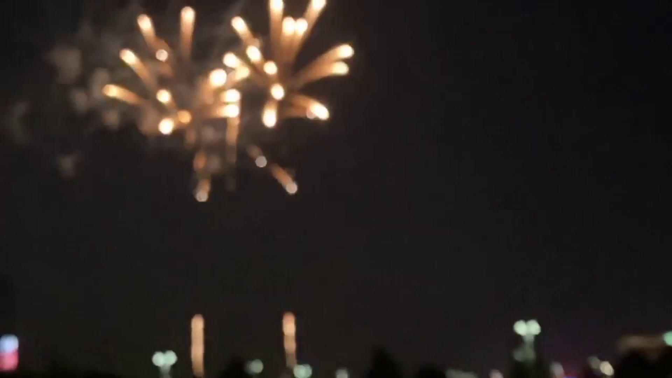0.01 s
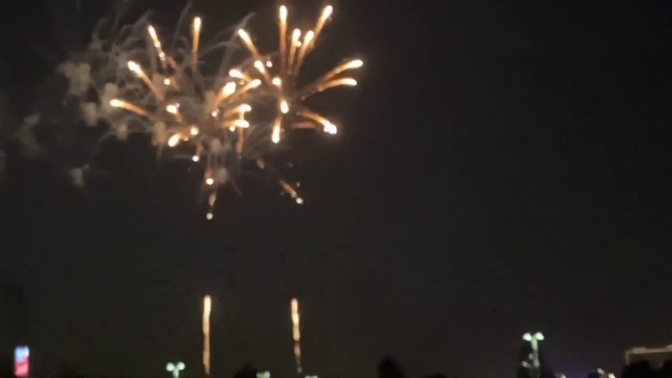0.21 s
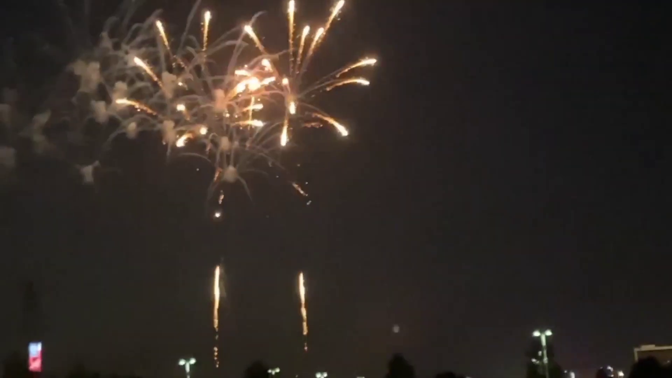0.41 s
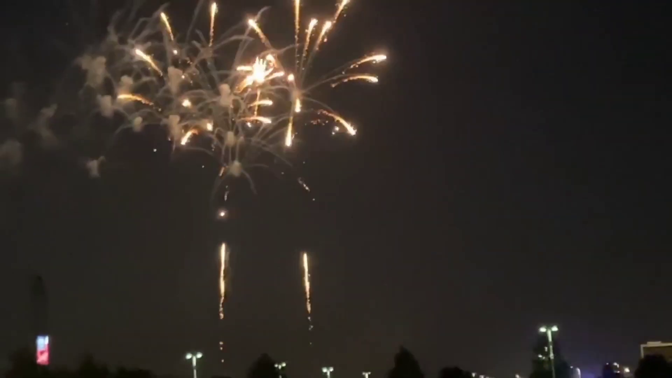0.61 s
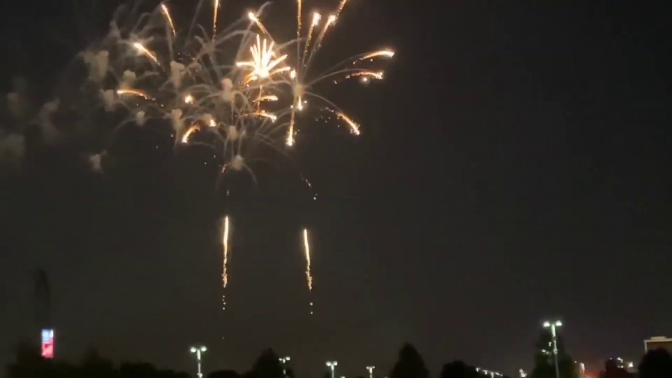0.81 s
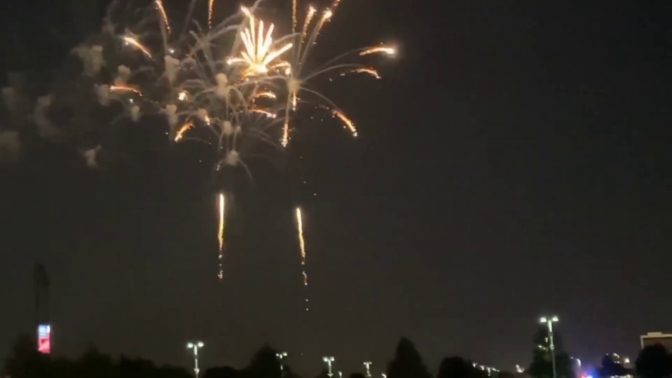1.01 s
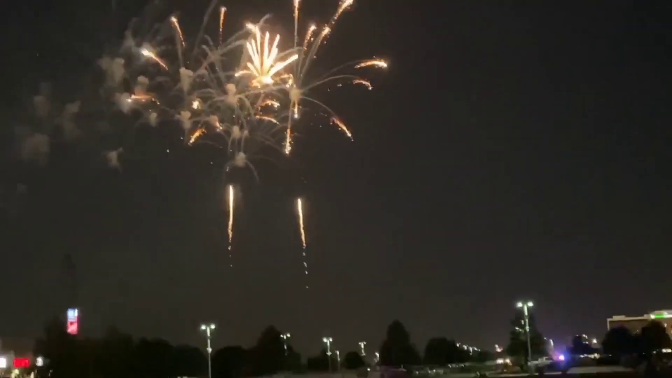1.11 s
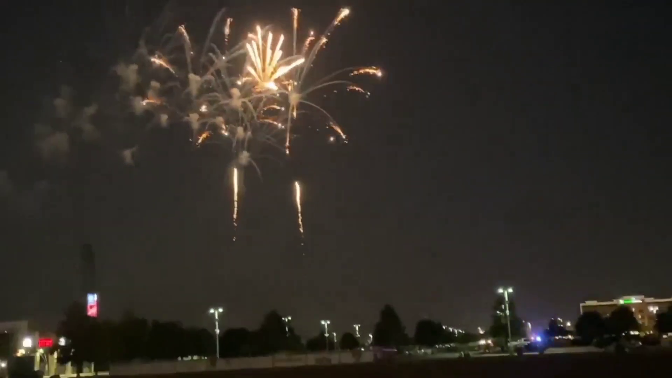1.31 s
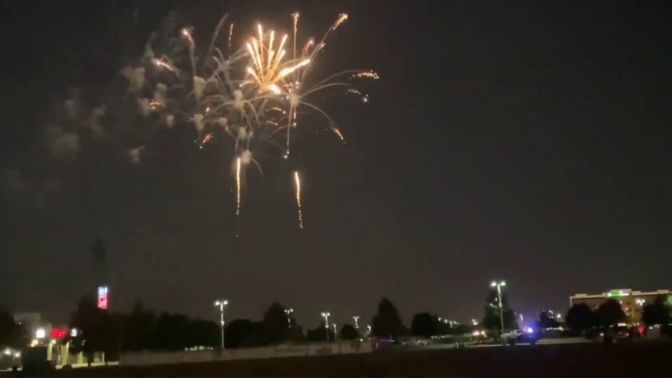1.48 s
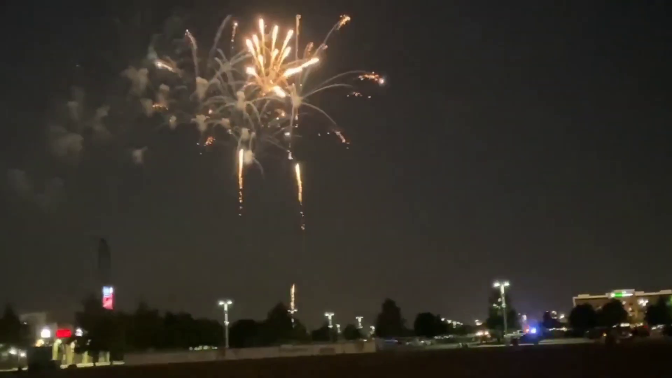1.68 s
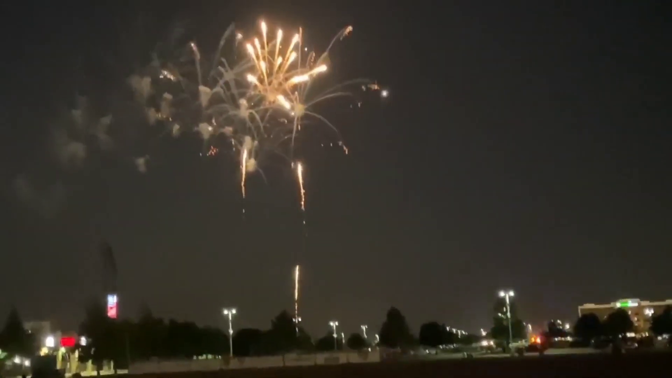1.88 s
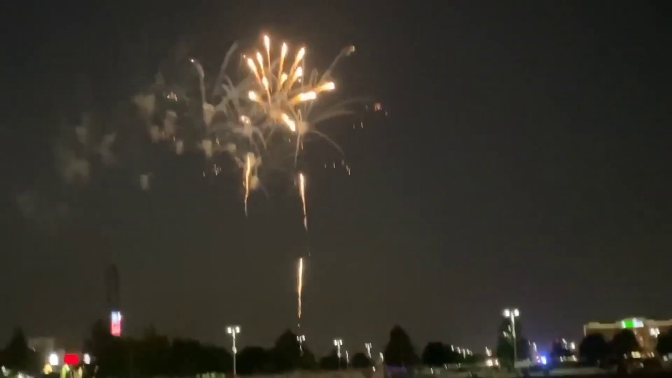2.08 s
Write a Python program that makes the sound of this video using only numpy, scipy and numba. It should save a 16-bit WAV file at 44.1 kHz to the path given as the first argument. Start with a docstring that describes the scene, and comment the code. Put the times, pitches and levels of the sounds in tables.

```python
"""A faint sizzle over a low rumble, then two sharp bangs and duller thuds: fireworks far across an open field at night.
A phone hears each blast as a fast downward sweep, treble first and bass last, that rolls back off the surroundings.
Single stars snap, random sparks make the sizzle, and filtered noise makes the rumble, the roll and a distant wash.
The phone's limiter holds down all but the bass for a moment after loud bangs, so the sizzle ducks."""
import sys
import numpy as np
from scipy import signal
from scipy.fft import rfft, irfft
from scipy.io import wavfile
from scipy.ndimage import uniform_filter1d, minimum_filter1d
from numba import njit

SR = 44100
rng = np.random.default_rng(int(sys.argv[2]) if len(sys.argv) > 2 else 0)


def digitize_waveform(pressure):
    """Quantize a signal to 16-bit integers and store it at the path in sys.argv[1].

    Rows of a 2-D input are taken as channels; values are limited to [-1, 1].
    """
    field = np.atleast_2d(pressure).T
    bounded = np.clip(field, -1, 1)
    quanta = np.round(bounded * 32767).astype(np.int16)
    wavfile.write(sys.argv[1], SR, quanta)


N = 92610  # 2.1 s


def undb(db):
    """Decibels to gain."""
    return 10 ** (np.asarray(db) / 20)


def unit(x):
    """Scale to rms 1."""
    return x / np.sqrt(np.mean(x ** 2))


def bins():
    """Frequency of every spectral bin in Hz, at least 1."""
    return np.maximum(np.arange(N // 2 + 1) * SR / N, 1)


def colour(points):
    """Gain in every bin, drawn through (Hz, dB) points on a log frequency axis."""
    hz, db = np.array(points).T
    return undb(np.interp(np.log(bins()), np.log(hz), db))


def causal(gain):
    """Minimum-phase spectrum: the given gains, ringing only after the onset."""
    cepstrum = irfft(np.log(gain), N)
    cepstrum[1:N // 2] *= 2
    cepstrum[N // 2 + 1:] = 0
    return np.exp(rfft(cepstrum))


def tail(delay_s, decay_s):
    """Spectrum of an exponentially dying cloud of noise with unit energy."""
    t = np.arange(N) / SR - delay_s
    cloud = rng.standard_normal(N) * (t > 0) * np.exp(-np.abs(t) / decay_s)
    return rfft(cloud / np.linalg.norm(cloud))


def walk(rate):
    """Smooth random wander of rms 1 that takes a new value about rate times a second."""
    step = int(SR / rate)
    stairs = np.repeat(rng.standard_normal(N // step + 1), step)
    smooth = uniform_filter1d(uniform_filter1d(stairs, step), step)
    return unit(smooth[:N])


# Stereo width of the steady sounds and the echoes at the phone. Each row: frequency in Hz, side against mid in dB.
WIDTH = [(60, -24), (110, -25), (200, -12.5), (360, -10.5), (650, -7), (1200, -2.5), (1950, -6),
         (2300, -74), (7000, -47)]


def spread(mid, side, points):
    """Two noises become mid and side of a coloured stereo pair, widest in the middle frequencies."""
    mid_spectrum = rfft(mid) * colour(points)
    side_spectrum = rfft(side) * colour(points) * colour(WIDTH)
    return unit(irfft(np.array([mid_spectrum + side_spectrum, mid_spectrum - side_spectrum]), N))


# The blasts over the field. Each row: start in seconds, relative level in dB, corner in Hz above which
# it is dull, sweep in cycles of delay, ground bounce delay in seconds, relative crack level in dB.
BURSTS = [(0.2118, 2, 12400, 1.05, .0014, -3.5), (0.3982, 2, 11000, .92, 0.0019, 0),
          (0.882, -11, 170, 1, 0.0056, -42.5), (1.103, 5, 84, 1.4, .0055, -10),
          (1.193, 0.5, 188.4, .9, 0.0059, -3.5), (1.285, -12.5, 290, .6, .0028, -14.5),
          (1.912, -6, 84, 1, 0.01, -25), (2.042, -19.5, 192, 1.95, .0035, -29)]
# Spectrum of a blast before dulling. Each row: frequency in Hz, relative level in dB.
BLAST = [(20, -32), (48, -15.5), (62, -6.5), (87, 2), (140, 0.5), (180, -3.5), (245, -8), (310, -10.5),
         (410, -2.5), (650, -8), (830, -12), (1050, -17.5), (2000, -22.5), (2900, -30), (4000, -33.5),
         (5600, -38.5), (8000, -46.5), (11000, -51.5), (14000, -70)]
# Blast at the two microphones. Each row: frequency in Hz, left minus right in dB.
BLAST_PAN = [(200, -0.5), (400, -2.5), (700, 2), (1150, 5.5), (2100, 0), (3500, 0)]
# Crackle that opens a burst. Each row: frequency in Hz, relative level in dB.
CRACK = [(250, -38), (500, -24), (1000, -27), (2400, -42), (4500, -39.5), (6500, -57), (8500, -75),
         (12000, -100)]
# Colour of the echoes off the surroundings. Each row: frequency in Hz, relative level in dB.
ECHO = [(40, -23), (90, -6), (180, 4), (260, -3.5), (330, -15.5), (1000, -12), (4000, -5)]
BLAST_DB = 41.5  # added to every burst level
RIGHT_LAG_S, LAG_BELOW_HZ = .00017, 1320
SWEEP_ZERO_HZ = 6400  # here the sweep leaves the phase alone
GROUND_DB = -11  # strength of the ground bounce
CRACK_DECAY_S = 0.013
SCATTER_DB, SCATTER_ABOVE_HZ, SCATTER_S = 3, 2150, .003  # ragged edge just behind the front
ECHO_DB, ECHO_DELAY_S, ECHO_DECAY_S = -13, 0.028, 0.058


def bursts():
    """Swept pressure pulses, each with an inverted ground bounce, a rough crack, a ragged edge and low echoes."""
    f, sides = bins(), np.array([[1], [-1]])  # left, right
    lag = RIGHT_LAG_S / (1 + (f / LAG_BELOW_HZ) ** 6)
    ports = colour(BLAST_PAN) ** (sides / 2) * np.exp(1j * np.pi * f * lag * sides)
    blast, crackle, echoes, width = colour(BLAST), colour(CRACK), colour(ECHO), colour(WIDTH)
    out = 0
    for start, db, dull_hz, cycles, bounce_s, crack_db in BURSTS:
        # every frequency is late by the same number of its own cycles
        sweep = np.exp(-2j * np.pi * cycles * np.log(f / SWEEP_ZERO_HZ))
        ground = 1 - undb(GROUND_DB) * np.exp(-2j * np.pi * f * bounce_s)
        body = causal(blast / np.hypot(1, (f / dull_hz) ** 4)) * sweep * ground
        ragged = undb(SCATTER_DB) * tail(0, SCATTER_S) * f / (f + SCATTER_ABOVE_HZ)
        crack = undb(crack_db) * crackle * tail(0, CRACK_DECAY_S)
        echo_mid = tail(ECHO_DELAY_S, ECHO_DECAY_S)
        echo_side = width * tail(ECHO_DELAY_S, ECHO_DECAY_S)
        echo = undb(ECHO_DB) * echoes * (echo_mid + sides * echo_side)
        arrival = undb(BLAST_DB + db) * np.exp(-2j * np.pi * f * start)
        direct = ports * (body * (1 + ragged) + crack)
        out = out + arrival * (direct + body * echo)
    return irfft(out, N)


# Snaps of single stars. Each row: start in seconds, energy in dB, centre in Hz.
SNAPS = [(1.1135, -6.5, 3700), (1.193, -6, 2420), (1.198, -17, 4360), (1.2727, -13.5, 2700)]
SNAP_DECAY_S, SNAP_WIDTH_OCT, SNAP_SKIRT_DB = .003, 0.49, -55


def snaps():
    """Single stars that pop: a few milliseconds of noise around one pitch."""
    out = 0
    for start, db, hz in SNAPS:
        band = np.exp(-(np.log2(bins() / hz) / SNAP_WIDTH_OCT) ** 2)
        pop = irfft(causal(band + undb(SNAP_SKIRT_DB)) * tail(start, SNAP_DECAY_S), N)
        out = out + undb(db) * pop / np.linalg.norm(pop)
    return out


SPARKS_PER_S, SPARK_SPREAD_DB = 1500, 3.5
SPARK_SHARE = 0.57  # share of the power in pops, the rest is hiss


def sparks():
    """Dense one-sample pops of uneven size and random sign, mixed with hiss."""
    sizes = undb(SPARK_SPREAD_DB * np.minimum(rng.standard_normal(N), 2))
    pops = (rng.random(N) < SPARKS_PER_S / SR) * rng.choice([-1, 1], N) * sizes
    hiss = rng.standard_normal(N)
    return np.sqrt(SPARK_SHARE) * unit(pops) + np.sqrt(1 - SPARK_SHARE) * hiss


FLUTTER_DB, FLUTTER_PER_S = 1.3, 70
DRIFT_DB, DRIFT_PER_S = 0.67, 9.03


def shimmer(x):
    """Each half-octave flutters and drifts in level on its own."""
    octave, spectrum = np.log2(bins()), rfft(x)
    out = 0
    for k in range(12, 29):  # centres from 64 Hz to 16 kHz
        band = irfft(spectrum * np.maximum(1 - np.abs(2 * octave - k), 0), N)
        out = out + band * undb(FLUTTER_DB * walk(FLUTTER_PER_S) + DRIFT_DB * walk(DRIFT_PER_S))
    return unit(out)


# Sizzle of the burning stars. Each row: frequency in Hz, relative density in dB per Hz.
SIZZLE = [(300, -1.5), (700, -7), (1150, -4), (1450, 1.5), (2500, 0), (2900, -5), (3250, -1), (3750, -5.5),
          (4300, -6), (5600, -11), (6600, -18.5), (7800, -30), (8800, -65.5), (14000, -92)]
FLICKER_DB, FLICKER_PER_S = 0.7, 34.9


def sizzle():
    """Burning stars: coloured sparks that shimmer by band and flicker as a whole."""
    return undb(FLICKER_DB * walk(FLICKER_PER_S)) * shimmer(spread(sparks(), sparks(), SIZZLE))


def even(x):
    """Smooth the lumps out of a low noise, over 70 ms, so that it rolls on without gaps."""
    power = uniform_filter1d(np.mean(x ** 2, axis=0), int(.07 * SR))
    return unit(x / np.sqrt(power + 1e-6))


# Echoes of earlier bursts rolling round the field. Each row: frequency in Hz, relative density in dB per Hz.
ROLL = [(70, -25), (110, 0.5), (135, 1.5), (190, -2.5), (255, -8), (300, -17), (600, -84)]


def roll():
    """Echoes of earlier bursts, merged into an even noise mostly below 250 Hz."""
    return even(spread(*rng.standard_normal((2, N)), ROLL))


# Low rumble over the field. Each row: frequency in Hz, relative density in dB per Hz.
RUMBLE = [(20, -17.5), (35, 5), (55, 6.5), (85, 14), (110, 7), (150, -4), (300, -67)]


def rumble():
    """Even low noise, strongest around 85 Hz."""
    return even(spread(*rng.standard_normal((2, N)), RUMBLE))


# Wide wash of distant noise. Each row: frequency in Hz, relative density in dB per Hz.
WASH = [(150, -49), (300, -1.5), (410, 4), (640, 2), (820, -5), (970, 1), (1150, -7), (1400, -6),
        (2200, -22), (2900, -48)]
WASH_PAN_DB = 3.5  # left over right


def wash():
    """Distant mid-range noise that shimmers by band and leans left."""
    pan = undb(WASH_PAN_DB * np.array([[.5], [-.5]]))
    return shimmer(spread(*rng.standard_normal((2, N)), WASH)) * pan


# Steady sounds as they reach the phone. Each row: time in seconds, then relative levels in dB
# of rumble, roll, wash and sizzle.
LEVELS = [(.05, -31, -33.5, -35.5, -37.5), (0.172, -31, -33, -38, -40), (.33, -38, -28.5, -41.5, -40),
          (.39, -30, -32.5, -38.5, -39), (.5, -34, -30.5, -36.5, -37), (.58, -29, -26.5, -36.5, -38),
          (.69, -38, -29.5, -40.5, -40), (.8, -32.5, -29, -37.5, -37), (.93, -32.5, -28.5, -36, -37.5),
          (1.04, -31.5, -32, -35.5, -36), (1.109, -35, -30, -35, -34.5), (1.241, -32, -28, -36, -35),
          (1.401, -34, -32.5, -36.5, -37.5), (1.5, -33.5, -33, -36.5, -34),
          (1.59, -35.5, -34.5, -36.5, -36), (1.71, -35.5, -33, -38.5, -34.5),
          (1.92, -34.5, -38.5, -36, -35.5), (2.1, -38.5, -34, -38.5, -36)]


def scene():
    """Bursts and snaps over the sizzling stars, rolling echoes, rumble and a distant wash."""
    times, *columns = np.array(LEVELS).T
    gains = [undb(np.interp(np.arange(N) / SR, times, column)) for column in columns]
    rumble_gain, roll_gain, wash_gain, sizzle_gain = gains
    stars = bursts() + snaps() + sizzle_gain * sizzle()
    background = roll_gain * roll() + rumble_gain * rumble() + wash_gain * wash()
    return stars + background


@njit
def limiter(need, hold, release):
    """Gain that drops at once to what a peak needs, holds, then recovers; times in samples."""
    out, gain, wait = np.empty(len(need)), 1., 0.
    for i in range(len(need)):
        if need[i] < 1:
            gain, wait = min(gain, need[i]), hold
        wait -= 1
        if wait < 0:
            gain += (1 - gain) / release
        out[i] = gain
    return out


LIMIT_ABOVE_HZ, CEILING = 275, 0.94
LOOKAHEAD_S, HOLD_S, RELEASE_S = .0025, 0.11, 0.021
OPENS_S, OPENING_S, CLOSED_DB = 0.047, 0.00065, -74
CLIP_AT, TOP_HZ = 1, 13300


def record(dry):
    """The sound starts after a brief silence; the phone limits all but the bass after loud bangs, rounds what
    still overshoots and cuts the top."""
    bass = irfft(rfft(dry) / (1 + (bins() / LIMIT_ABOVE_HZ) ** 8), N)
    upper = dry - bass
    ahead = max(int(LOOKAHEAD_S * SR), 1)
    peak = np.abs(upper).max(axis=0)
    need = minimum_filter1d(CEILING / np.maximum(peak, CEILING), 2 * ahead + 1)
    gain = uniform_filter1d(limiter(need, float(HOLD_S * SR), float(RELEASE_S * SR)), ahead)
    opening = np.clip((np.arange(N) / SR - OPENS_S) / OPENING_S, undb(CLOSED_DB), 1)
    x = (bass + upper * gain) * opening
    rounded = x / (1 + (x / CLIP_AT) ** 6) ** (1 / 6)
    return signal.sosfilt(signal.ellip(8, .2, 70, TOP_HZ, fs=SR, output="sos"), rounded)


dry = scene()
out = record(dry)
digitize_waveform(out)
```